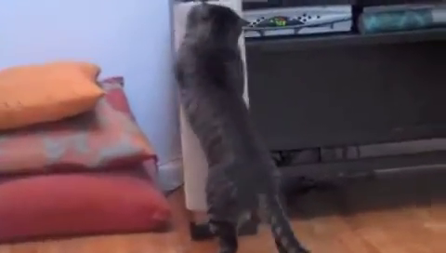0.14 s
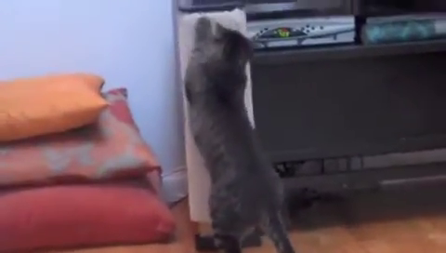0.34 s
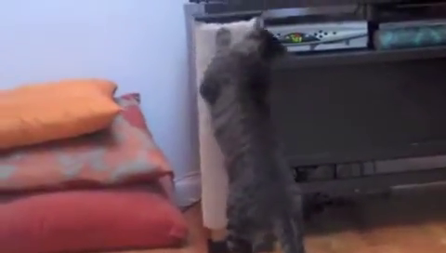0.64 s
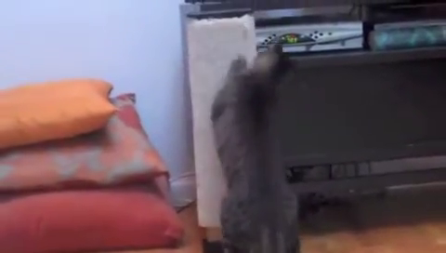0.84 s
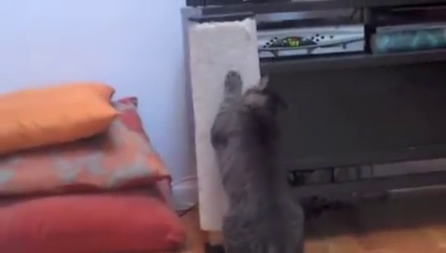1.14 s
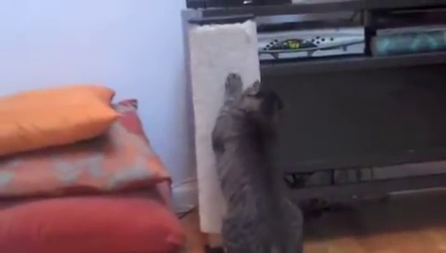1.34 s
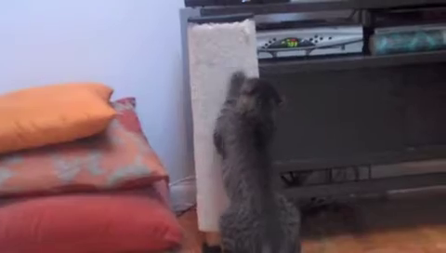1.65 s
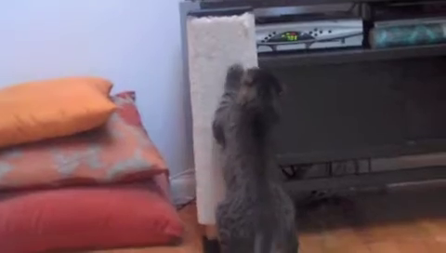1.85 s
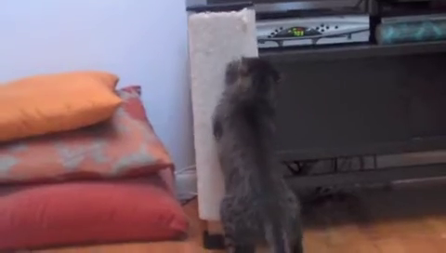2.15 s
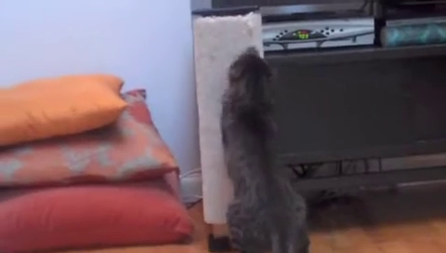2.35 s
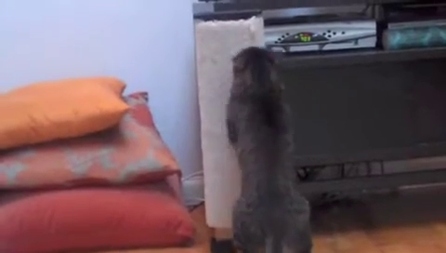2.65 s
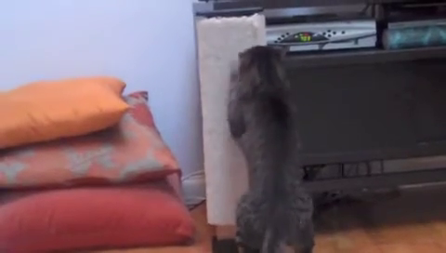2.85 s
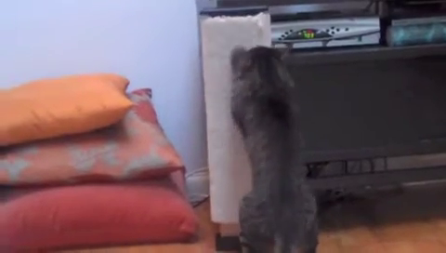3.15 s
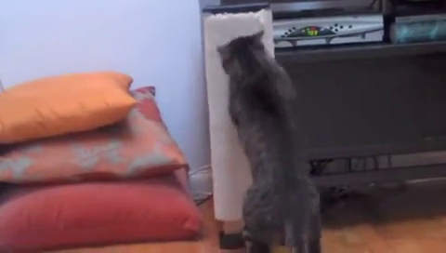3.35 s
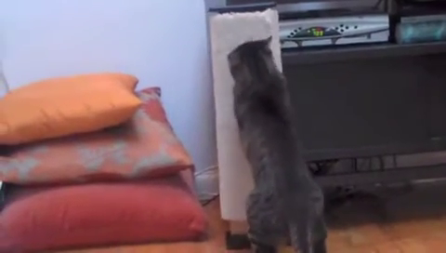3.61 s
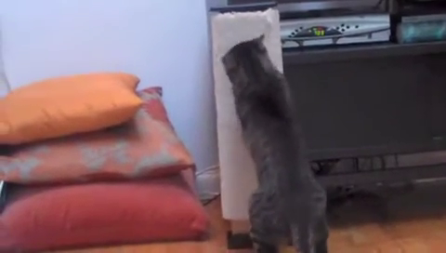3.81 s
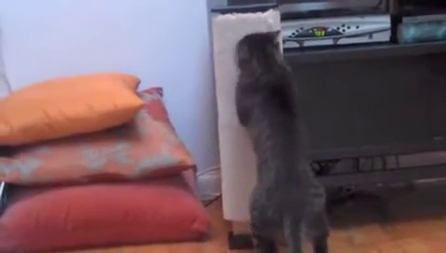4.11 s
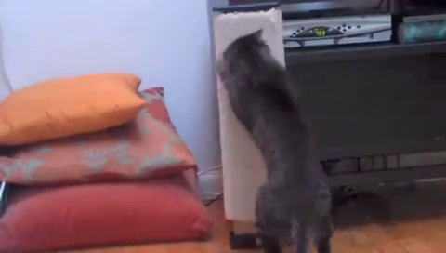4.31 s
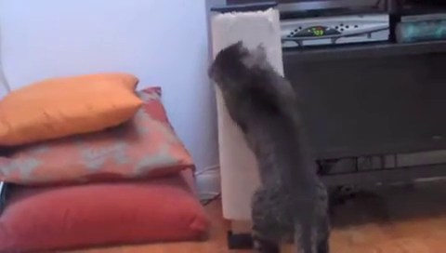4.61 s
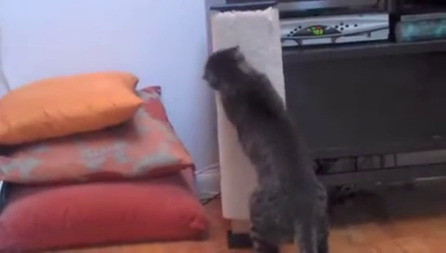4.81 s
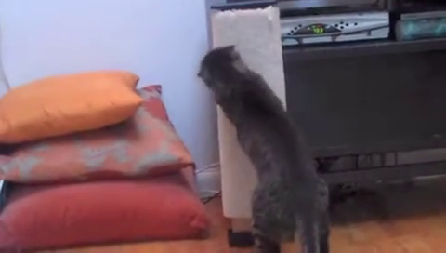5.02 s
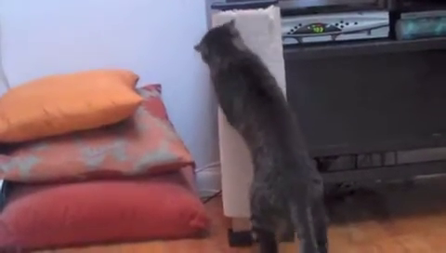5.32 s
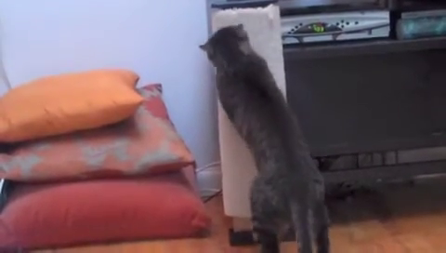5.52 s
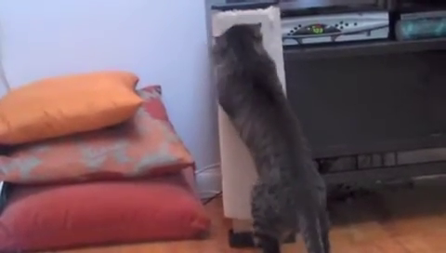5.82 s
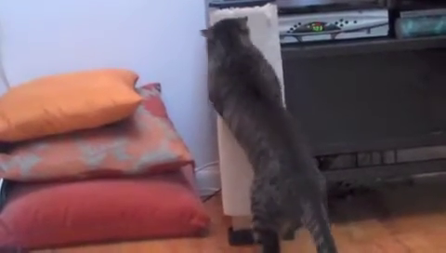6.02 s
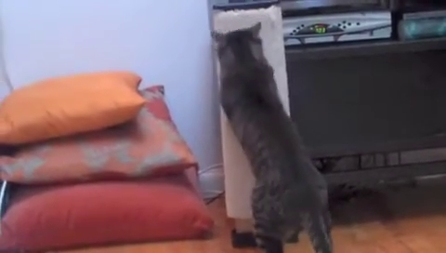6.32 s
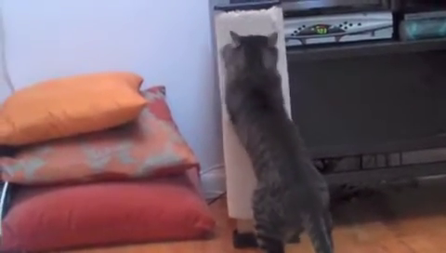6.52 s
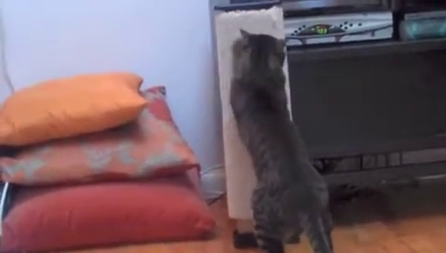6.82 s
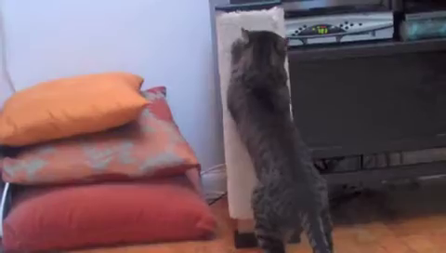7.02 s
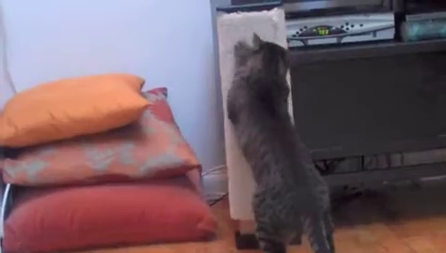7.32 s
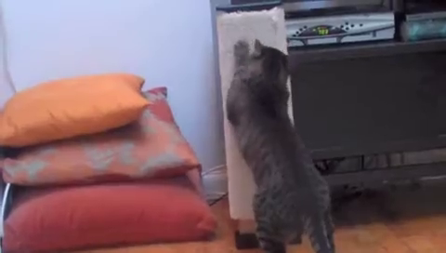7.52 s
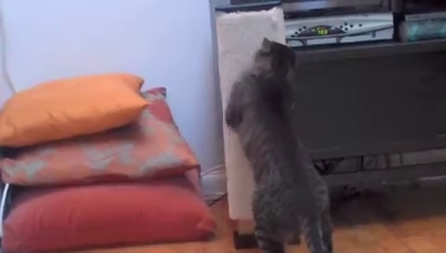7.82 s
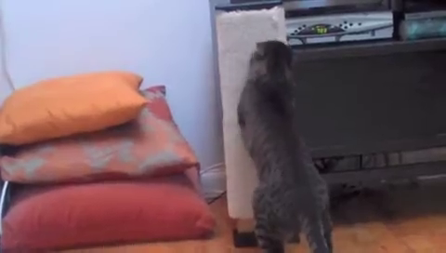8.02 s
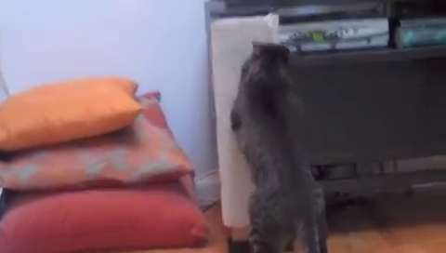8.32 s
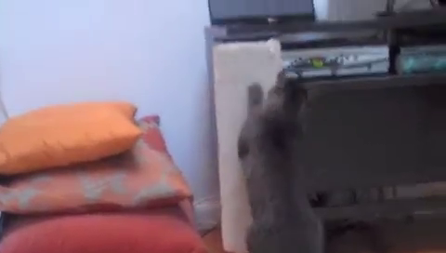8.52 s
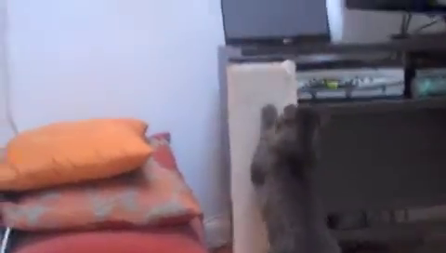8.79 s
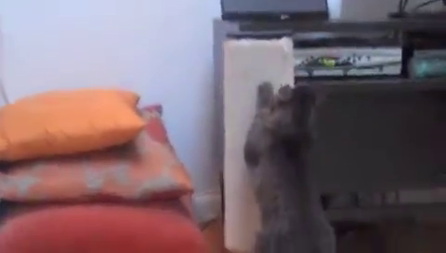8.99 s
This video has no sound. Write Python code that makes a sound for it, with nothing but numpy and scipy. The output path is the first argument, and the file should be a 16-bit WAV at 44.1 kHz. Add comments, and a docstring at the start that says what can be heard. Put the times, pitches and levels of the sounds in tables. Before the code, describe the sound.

A cat claws a carpeted scratching post indoors, with irregular sharp rips and clusters of small dry snaps over quiet room noise.

```python
"""A cat hooks its claws into a carpeted board and tears them free, a few metres away.
Each release is a burst of snapping loops: impulses that excite the board's resonances and rock it
on its foot. Between them the paws slide over the pile with a soft crackle. A bare-floored room
answers with early reflections and a half-second reverberant tail, over quiet room noise."""
import sys
import numpy as np
from scipy import signal
from scipy.fft import rfft, irfft
from scipy.io import wavfile
from scipy.ndimage import uniform_filter1d

SR = 44100
rng = np.random.default_rng(int(sys.argv[2]) if len(sys.argv) > 2 else 0)


def store_wav(level_fs):
    """Save 16-bit WAV to argv[1]."""
    pcm = np.round(np.clip(np.atleast_2d(level_fs), -1, 1) * 32767)
    wavfile.write(sys.argv[1], SR, pcm.T.astype(np.int16))


N = 403515
PRE_ROLL = 220  # samples of room for the early snaps of a release


def claws(rock_lag_s=0.0133, room_modes_db=-1.3):
    """Modal response to each release: direct sound, feeds to walls and tail, and the board's rocking."""
    # modes of the board rocking on its foot: pitch_hz, width_hz, gain_db
    rocking_modes = [(50, 2.4, -1), (63.2, 5.5, 1), (81, 2.4, -3.5), (108.7, 7.5, -7), (162.7, 15.8, -1.5)]
    # steady resonances of the room that colour the tail: pitch_hz, width_hz, relative_db
    room_modes = [(253, 72, -7.5), (406, 38, -7), (555, 21, 1.5), (724, 13, -2), (690, 11, -5),
                  (864, 19, -15), (940, 200, -1.5), (1350, 33, -13), (1610, 18, -22), (1670, 95, -7.5),
                  (1900, 36, -11.5), (2090, 40, -10), (2330, 78, -6.5), (2685, 190, -0.5)]
    direct, to_walls, to_tail, push = np.zeros((4, N + PRE_ROLL))
    shove = np.hanning(220)  # a 5 ms pulse of force as the board tips back
    for start_s, level_db, shares_db, tear_ms, send_db, rock_db in releases():
        ahead, all_round = gain_of(level_db) * snapping_loops(shares_db, tear_ms)
        release_s = start_s + .001  # each release sounds 1 ms after its listed time
        add(direct, release_s, ahead)
        add(to_walls, release_s, gain_of(send_db) * ahead)
        add(to_tail, release_s, gain_of(send_db) * all_round)
        add(push, release_s + rock_lag_s, gain_of(level_db + rock_db) * shove)
    rocking = sum(gain_of(db) * resonate(push, hz, width) for hz, width, db in rocking_modes)
    to_tail += sum(gain_of(db + room_modes_db) * resonate(to_tail, hz, width)
                   for hz, width, db in room_modes)
    return np.array([direct, to_walls, to_tail, rocking])[:, PRE_ROLL:]


def releases(rip_ms=3.0, snag_ms=0.77, snag_rock_db=-9):
    """Sudden release of tension: yields each rip and snag with its share of the six resonances."""
    # a hooked claw rips free and knocks the board:
    # start_s, level_db, hollow_db, wood_db, tip_db, rock_db, send_db (the last five are relative)
    rips = [(0.0187, -18.5, -13, -7, 4, -6.5, -4), (0.2503, -11.5, -8, -9, -3, -4.5, 0.75),
            (0.86, 1.26, -11.5, -5.5, -1.9, -12, -4), (1.692, -23.5, -9.5, -16, -4, -11, -0.2),
            (1.9881, -36, 0.5, -11, -6, 0, -0.5), (2.169, -23.5, -6.5, -1.5, -4.5, -7, -1.5),
            (2.6124, -31.5, -4, 3, -2, 4, -3.5), (2.87, -7.5, -16.5, -5, -8.5, -9, -2.2),
            (3.4905, -6.5, -12.5, -16, -16.5, -8.5, -3), (4.2426, -23, -18, -16, 0, -14, -9),
            (4.2825, -11, -16, -10.5, -15, -7.5, -0.9), (4.6661, -26.5, -7, 0.5, -4.5, -2.5, -1.2),
            (5.1316, -22.5, -19, -12, -7, -19, -1.2), (5.1915, -23, -25, -9, 0.5, -7.5, -0.8),
            (5.46, -12.5, -18, -7, -16, -12, -1.5), (6.0894, -18, -18.5, -10, -5.5, -16, -1.5),
            (6.1166, -13, -15, -7, -16, -9.5, -2.5), (7.1529, -27, 1.2, -3, -4.5, -1, -0.7),
            (7.888, -23.5, -3.5, -1, -5.5, -9, -1.4), (8.1627, -29, 3, 12.5, 7, -2.5, 1.4),
            (8.4291, -6.5, -11.5, -25, -15.5, -7, -2)]
    # a single loop slips off a claw tip with a short dry snap: start_s, level_db, tip_db, send_db
    snags = [(0.2207, -24, 3, -0.5), (0.4852, -33.5, 12, -7), (0.606, -23.5, 13, -6),
             (0.616, -28.5, 14, -11), (0.6996, -34, 18, -5), (0.754, -30.5, 6, -4), (0.7572, -27, 12, -12),
             (0.7947, -41, 6, 14.5), (0.8099, -17, 17, -10), (1.6646, -40, 3, -5), (1.816, -28.5, 2, -2.5),
             (2.079, -36.5, -1, 2), (2.125, -40, 8, -10), (2.4717, -25.5, 5.5, -4), (2.5942, -34, 14, 9),
             (2.604, -21, 5, -17), (2.8299, -27.5, 3, -5), (3.2989, -40, 17, -1.2), (3.3426, -33.5, 18, -5),
             (3.3528, -32.5, 18, -9), (3.395, -37, 14, -4), (3.4473, -26.5, 3, -2), (3.9525, -43, 14, -5),
             (4.0332, -40, 9, -3), (4.085, -43, 10, -9), (4.1894, -39.5, 16, -7), (4.235, -24.5, 4, 2.5),
             (4.5904, -29, 15, 4), (4.6017, -25, 16, -9), (4.6148, -23, 15, -8), (4.8082, -33.5, 19, -11),
             (5.1466, -24, 16, -5), (6.5505, -38, -14, -7), (6.6427, -38.5, -23, -4),
             (7.0444, -25.5, 17, -5.5), (7.123, -26, 10, -3), (7.7079, -22.5, 2.5, -4), (7.847, -35, 10, 4),
             (7.8587, -30, 1.2, -16), (8.0424, -35, 17, -2.5), (8.1489, -30.5, 2, 0.5),
             (8.3702, -26, 10, 0), (8.379, -30, -19, -7), (8.383, -21.5, -17, -5)]
    # shares of the three carpet backing and tip resonances in a rip: base_db, tip_weight
    rip_shares = [(0.5, 1), (-4, 0.95), (-17.5, 0.9)]
    # shares of all six resonances in a snag: base_db, tip_weight
    snag_shares = [(-10, 0), (-5.5, 0.25), (1.5, 0), (0, 0.72), (-6.5, 1), (-15, .8)]
    for start_s, level_db, hollow_db, wood_db, tip_db, rock_db, send_db in rips:
        shares_db = [hollow_db, wood_db, 0, *np.dot(rip_shares, [1, tip_db])]
        yield start_s, level_db, shares_db, rip_ms, send_db, rock_db
    for start_s, level_db, tip_db, send_db in snags:
        yield start_s, level_db, np.dot(snag_shares, [1, tip_db]), snag_ms, send_db, snag_rock_db


def snapping_loops(shares_db, tear_ms, lesser_size=.6, uneven_db=2.0):
    """Impulse excitation by one hard snap and seven lesser: sound ahead and averaged over directions."""
    # resonances from hollow board over board face and carpet backing to claw tip, which clicks first:
    # pitch_hz, nominal_width_hz, onset_in_tear_lengths
    resonances = [(370, 350, 0.55), (890, 850, 0.568), (1687, 864, 0.3), (3360, 1800, -.2),
                  (5330, 2600, -.3), (9450, 1900, -.35)]
    tear_samples = tear_ms * SR / 1000
    ahead, power = np.zeros(2048), 0
    impulse = signal.unit_impulse(len(ahead))
    for (hz, width, onset), db in zip(resonances, shares_db):
        hardest_at = PRE_ROLL + onset * tear_samples
        lesser_at = hardest_at + np.minimum(rng.exponential(1, 7), 4) * tear_samples
        snaps = np.zeros(len(ahead))
        snaps[lesser_at.astype(int)] = lesser_size * rng.uniform(-0.98, 1, 7)
        snaps[int(hardest_at)] = 1
        ringing = gain_of(db) * unit_band(impulse, hz, 1.48 * width)
        ahead += np.convolve(snaps, ringing[:600])[:len(ahead)] / np.linalg.norm(snaps)
        power += abs(rfft(ringing)) ** 2  # the parts add by power, without notches
    spectrum = np.sqrt(power)
    ripple = unit_rms(uniform_filter1d(rng.standard_normal(len(spectrum)), size=7))
    spot_colour = unit_rms(gain_of(uneven_db * ripple))  # each spot of the board rings unevenly
    all_round = np.roll(irfft(spectrum * spot_colour), PRE_ROLL)
    return np.array([ahead, all_round]) * 2.16 / irfft(spectrum).max()


def paws(clicks_per_s=2500, uneven_db=3.5):
    """Friction as shot noise: fibres flick back under the sliding paws in dense small clicks."""
    # loudness of the sliding: time_s, level_db
    drag = [(0, -46.5), (.15, -91), (.5, -64), (.85, -68), (1.3, -84), (1.6, -66), (1.75, -58), (1.92, -71),
            (2.05, -62), (2.45, -70.5), (3.2, -66.5), (3.35, -70), (3.45, -63), (3.8, -70), (4.7, -68.5),
            (4.9, -77), (6.0, -68), (6.5, -85), (7.2, -64.5), (7.7, -80), (8.05, -64), (8.3, -62),
            (8.5, -67), (9.15, -70.5)]
    # spectrum of the carpet pile: frequency_hz, relative_db
    pile = [(470, -53), (800, -25), (1280, 3.5), (1420, -6.5), (4130, -6), (9770, -23), (14000, -32)]
    sizes = gain_of(uneven_db * np.minimum(rng.exponential(1, N), 4))
    flicks = rng.random(N) < clicks_per_s / SR
    clicks = sizes * flicks * rng.choice([-1., 1.], N)
    colour = gain_of(curve_at(pile, np.fft.rfftfreq(N, 1 / SR)))
    return envelope(drag) * unit_rms(irfft(rfft(clicks) * colour, N))


def early_reflections(sound):
    """Specular reflection: floor, furniture and far wall each return a copy, a little apart per ear."""
    # reflection paths: delay_s, gain_db
    echoes = [(.0028, -12), (.0062, -13), (.0158, -4.5), (.0185, -11), (.0225, -12), (.0322, -11)]
    reflected = np.zeros((2, N))
    for delay_s, db in echoes:
        add(reflected[0], delay_s, gain_of(db) * sound)
        add(reflected[1], delay_s + rng.uniform(-1e-4, 1e-4), gain_of(db) * sound)
    return signal.lfilter([.6, .4], 1, reflected)  # soft furnishings absorb treble


def reverberation(sound, tail_db=4.0, build_s=0.0064):
    """Absorption makes the dense reflections decay exponentially, each band at its own rate."""
    # decay of the room: frequency_hz, t60_s, relative_db
    decay = [(40, 0.7, 11.5), (130, 0.31, 1), (220, 0.59, -0.5), (497, 0.52, 1), (1730, 0.55, -7.5),
             (4300, 0.55, -5.5), (11300, 0.41, -5)]
    tail = diffuse_field(SR, 256, lambda hz, t: curve_at(decay, hz, 2) - 60 * t / curve_at(decay, hz))
    tail *= 1 - np.exp(-(np.arange(SR) / SR / build_s) ** 2)  # reflections need time to thicken
    tail *= gain_of(tail_db) / np.linalg.norm(tail[0])
    return signal.fftconvolve(sound[None], tail, axes=1)[:, :N]


def room_noise(whine_hz=7881, whine_db=-91):
    """Superposition of a diffuse hush, a low rumble, a faint steady tone and a brief hiss."""
    # spectrum of the hush: frequency_hz, relative_db
    hush_spectrum = [(12, -50), (20, 3), (107, -13.5), (142, -6.5), (222, -3.5), (472, -5.5), (513, -6.5),
                     (923, -5.5), (1570, -11), (2910, -21.5), (4540, -25), (7730, -31), (12100, -42),
                     (16000, -70)]
    # slow drift of the hush: time_s, level_db
    hush_level = [(0, -49), (.7, -49.5), (1.4, -53), (2.1, -51.5), (2.4, -52), (3.3, -54.5), (4.0, -52.5),
                  (5.0, -51.5), (5.9, -51.5), (7.0, -50), (7.6, -50), (8.3, -49.5), (9.15, -49)]
    # the rumble comes and goes: time_s, level_db
    rumble_level = [(0, -50), (.6, -62), (1.4, -78), (2.3, -67), (3.3, -64), (4.0, -69), (4.9, -68),
                    (5.2, -61), (5.9, -63), (6.6, -77), (7.5, -75), (8.3, -65), (9.15, -63)]
    # a faint high hiss near the end: time_s, level_db
    hiss_level = [(8.78, -96), (8.88, -69), (8.97, -68), (9.06, -75), (9.15, -80)]
    hush = unit_rms(diffuse_field(N, 2048, lambda hz, t: curve_at(hush_spectrum, hz)))
    rumble = envelope(rumble_level) * unit_band(rng.standard_normal(N), hz=52, width_hz=45)
    whine = gain_of(whine_db) * np.sqrt(2) * np.sin(2 * np.pi * whine_hz * np.arange(N) / SR)
    hiss = envelope(hiss_level) * unit_band(rng.standard_normal((2, N)), hz=9600, width_hz=3500)
    return envelope(hush_level) * hush + rumble + whine + hiss


def diffuse_field(length, frame, level_db):
    """Stereo noise shaped by level_db(hz, t); long waves reach both ears nearly alike."""
    # likeness of left and right: frequency_hz, coherence
    likeness = [(60, 0.92), (150, 1), (380, 0.97), (950, 0.88), (2380, 0.56), (5980, 0.043), (15000, 0.16)]
    hop = frame // 4
    hz = np.fft.rfftfreq(frame, 1 / SR)[:, None]
    t = np.arange(length // hop + 5) * hop / SR
    shape = (2, len(hz), len(t))
    left, independent = rng.standard_normal(shape) + 1j * rng.standard_normal(shape)
    coherence = curve_at(likeness, hz)
    right = coherence * left + np.sqrt(1 - coherence ** 2) * independent
    spectra = np.array([left, right]) * gain_of(level_db(hz, t))
    return signal.istft(spectra, nperseg=frame, noverlap=frame - hop)[1][:, :length]


def resonate(x, hz, width_hz):
    """Damped two-pole resonance with unit gain at its centre."""
    return signal.lfilter(*signal.iirpeak(hz, hz / width_hz, SR), x)


def unit_band(x, hz, width_hz):
    """Two equal resonances in cascade, the output scaled to rms 1."""
    return unit_rms(resonate(resonate(x, hz, width_hz), hz, width_hz))


def gain_of(db):
    """Decibels to an amplitude ratio."""
    return 10 ** (np.asarray(db) / 20)


def unit_rms(x):
    """Scales to rms 1."""
    return x / np.sqrt(np.mean(x ** 2) + 1e-20)


def curve_at(points, hz, column=1):
    """Interpolates a table on a log-frequency axis."""
    columns = np.transpose(points)
    return np.interp(np.log(hz + 1), np.log(columns[0] + 1), columns[column])


def envelope(points):
    """A level curve as a gain for every sample."""
    time_s, level_db = np.transpose(points)
    return gain_of(np.interp(np.arange(N) / SR, time_s, level_db))


def add(mix, start_s, sound):
    """Superposes a sound on the mix from start_s."""
    part = mix[max(round(start_s * SR), 0):][:len(sound)]
    part += sound[:len(part)]


def scene():
    """The direct sound of cat and board sums with the room's reflections and noise."""
    direct, to_walls, to_tail, rocking = claws()
    slide = paws()
    reflected = early_reflections(to_walls) + reverberation(to_tail + slide)
    return direct + rocking + slide + reflected + room_noise()


def record(dry, cutoff_hz=16468):
    """Frequency response of two unequal microphone ports, followed by a band limit."""
    # level difference of the ports: frequency_hz, left_minus_right_db
    balance = [(60, -2.5), (99, 0.5), (160, -2.5), (270, -1), (450, 0), (740, -1.5), (1220, -1.5),
               (2010, -1), (3330, -1.0), (5500, 0), (9080, -4), (15000, 0.0)]
    # phase difference of the ports: frequency_hz, left_lead_rad
    phase_lead = [(2500, 0.), (4400, .2), (7000, 2.6), (9500, .2), (12500, .4), (15000, 2.5)]
    # bass and treble roll-off of both ports: frequency_hz, gain_db
    response = [(20, -13), (45, -2), (9000, 1.5), (12500, -1.5), (14500, -13), (16400, -31)]
    hz = np.fft.rfftfreq(N, 1 / SR)
    left = gain_of(curve_at(balance, hz) / 2) * np.exp(1j * curve_at(phase_lead, hz) / 2)
    ports = gain_of(curve_at(response, hz)) * np.array([left, 1 / left])
    heard = irfft(rfft(dry) * ports, N)
    lowpass = signal.firwin(511, cutoff_hz, window=("kaiser", 9), fs=SR)
    return signal.oaconvolve(heard, lowpass[None], "same")


dry = scene()
out = record(dry)
store_wav(out)
```